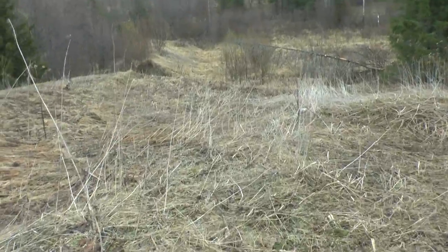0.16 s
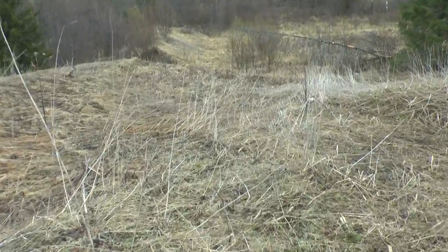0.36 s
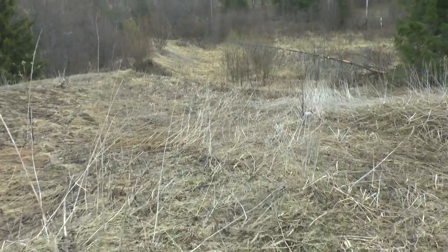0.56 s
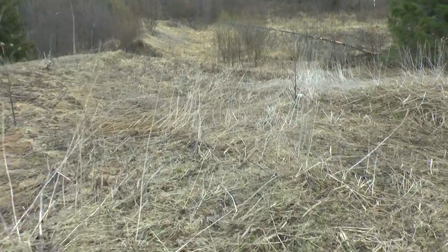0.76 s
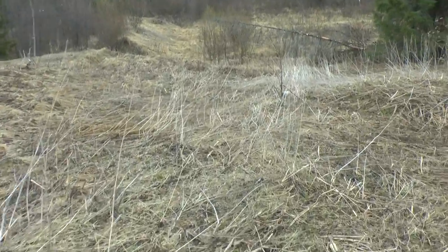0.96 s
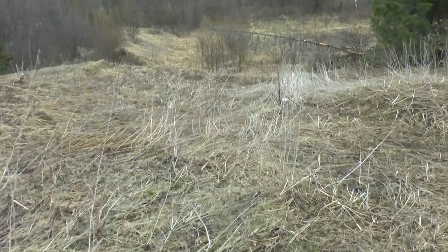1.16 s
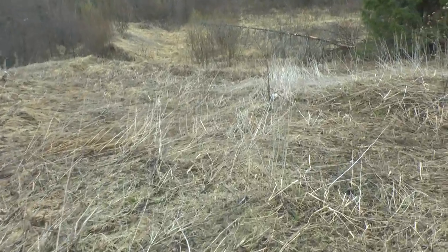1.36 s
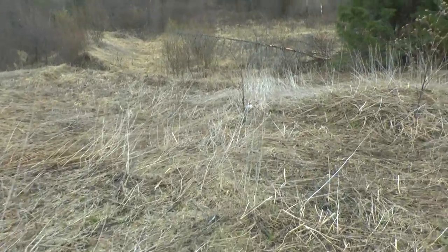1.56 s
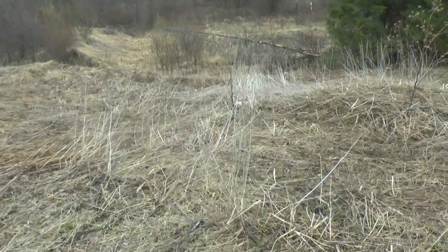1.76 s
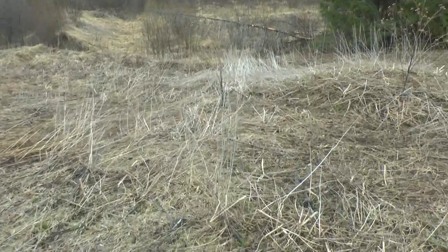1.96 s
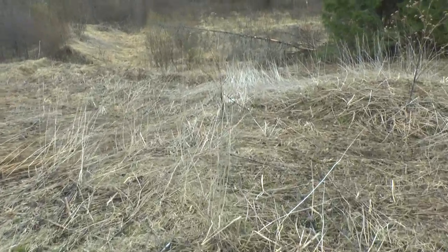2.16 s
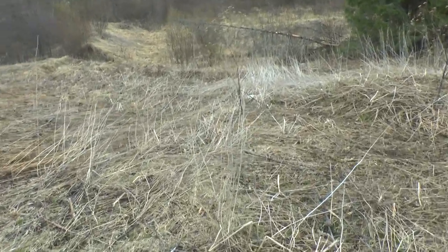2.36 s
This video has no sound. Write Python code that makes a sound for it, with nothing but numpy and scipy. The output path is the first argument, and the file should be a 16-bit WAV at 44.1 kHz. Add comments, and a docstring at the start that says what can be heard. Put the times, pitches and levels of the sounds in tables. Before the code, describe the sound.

Slow footsteps through dry, matted grass, heard close from just above the feet: straw rustles, stalks crackle, stems snap sharply and litter crunches dully, over low weight rumbles and a faint steady outdoor background.

```python
"""A rustle of dry straw and its first snapping stems open slow steps through flattened grass on a slope.
Heard from just above the feet: fibres rub and stalks crackle as filtered random clicks, stems snap as
short rings with bursts of splinter noise, and the shoe brushes blades aside as swells of dense clicks.
The damp litter crunches in dull crumbs and knocks as sagging tones; filtered noise gives the rumble
of the weight rolling over the foot and a faint, steady outdoor background."""
import sys
import numpy as np
from scipy import signal
from scipy.fft import rfft, irfft, next_fast_len
from scipy.io import wavfile

SR = 44100
rng = np.random.default_rng(int(sys.argv[2]) if len(sys.argv) > 2 else 0)


def put_to_file(sound):
    """Save the sound as 16-bit audio at rate SR, in the file named by the first command-line argument."""
    columns = np.atleast_2d(sound).T  # one column per channel
    safe = np.clip(columns, -1, 1)
    whole_steps = np.round(safe * 32767)
    wavfile.write(sys.argv[1], SR, whole_steps.astype(np.int16))


N = 110250  # 2.5 s


def from_db(db):
    """Decibels to gain."""
    return 10 ** (np.asarray(db) / 20)


def rms_one(x):
    """Scale to unit power."""
    return x / np.sqrt(np.mean(x ** 2) + 1e-20)


def in_time(rows):
    """A control curve at every sample, straight between its points."""
    return np.interp(np.arange(N) / SR, *np.transpose(rows))


def swells(rows):
    """A gain that rises to each top and falls away evenly in dB; overlapping swells add in power."""
    t = np.arange(N) / SR
    power = 0
    for top_s, level_db, rise_s, fall_s in rows:
        slopes_from_top = np.maximum((top_s - t) / rise_s, (t - top_s) / fall_s)
        power = power + from_db(level_db - 20 * slopes_from_top) ** 2
    return np.sqrt(power)


def colour(x, points):
    """Causal (minimum-phase) filter with the given spectrum, built by folding its cepstrum."""
    size = 2 * next_fast_len(N)
    hz, db = np.transpose(points)
    bin_hz = np.arange(size // 2 + 1) * SR / size
    log_gain = np.log(from_db(np.interp(np.log(bin_hz + 1), np.log(hz), db)))
    cepstrum = irfft(log_gain)[:size // 2] * np.r_[1, np.full(size // 2 - 1, 2)]
    return irfft(rfft(x, size) * np.exp(rfft(cepstrum, size)), size)[..., :N]


def drift(hz):
    """Smooth random wander with spread 1, from noise through two equal low-pass poles."""
    r = np.exp(-2 * np.pi * hz / SR)
    noise = rng.standard_normal(N + SR)
    return rms_one(signal.lfilter([1], [1, -2 * r, r * r], noise)[SR:])  # drop the filter's run-in


def clicks(per_s, spread_db):
    """Random clicks of uneven size, each from its own direction: common and difference rows."""
    sizes = from_db(spread_db * np.minimum(rng.exponential(1, N), 3))
    return (rng.random(N) < per_s / SR) * sizes * rng.choice([-1, 1], (2, N))


# Filter on the left-right difference, which sets the stereo width: pitch_hz [Hz], gain_db [dB]
WIDTH = [(380, -17), (1300, -10), (5500, -14), (7500, -13), (9500, 1)]


def stereo(pair):
    """A common and a difference signal to left and right; the top treble is widest."""
    common, difference = pair
    return common + colour(difference, WIDTH) * np.array([[1], [-1]])


AIR_DB = -51.5
# Colour of the background, relative levels: pitch_hz [Hz], level_db [dB]
AIR_COLOUR = [(20, -41), (60, -2), (120, 4.5), (280, 3), (500, -7), (850, -8), (1450, -13), (2450, -4.5),
              (3300, -11.5), (6500, -16), (16000, -32)]


def air():
    """Faint steady outdoor background: wide, filtered noise at a constant level."""
    return from_db(AIR_DB) * stereo(rms_one(colour(rng.standard_normal((2, N)), AIR_COLOUR)))


# Colour of the rumble, relative levels: pitch_hz [Hz], level_db [dB]
RUMBLE_COLOUR = [(20, -32), (90, -0.5), (125, -0.5), (210, -7.5), (450, -30), (1500, -50)]
# Weight rolling over the foot, each slope spanning 20 dB from the top:
# top_s [s], level_db [dB], rise_s [s], fall_s [s]
WEIGHT_ROLLS = [(1.095, -39, 0.24, 0.17), (1.515, -41, 0.099, .1), (1.665, -34.5, 0.17, 0.16),
                (2.22, -40.5, 0.15, 0.22), (2.385, -40.5, 0.14, 0.24)]


def rumble():
    """Low noise swells and fades as the weight rolls over the foot."""
    noise = rms_one(colour(rng.standard_normal((2, N)), RUMBLE_COLOUR))
    return stereo(swells(WEIGHT_ROLLS) * noise)


THUD_ATTACK_S, THUD_SAG_S = 0.0012, 0.0015
# Dull knocks in the litter, level before the soft attack and the high-pass:
# start_s [s], level_db [dB], pitch_hz [Hz], t60_s [s]
THUDS = [(.079, -40, 440, .03), (0.1255, -34, 265, 0.032), (0.208, -31, 245, 0.03),
         (0.611, -33, 450, 0.026), (0.670, -19.5, 235, 0.025), (0.756, -31.5, 350, 0.018),
         (.941, -28, 220, .05), (1.458, -24, 420, .03), (1.483, -23, 300, .028), (1.873, -33, 410, .022),
         (2.368, -34, 380, .03), (2.477, -25, 260, 0.025)]


def knocks():
    """Heavily damped low tones that start an octave high and sag to pitch as the litter yields."""
    out = 0
    for start_s, level_db, pitch_hz, t60_s in THUDS:
        t = np.maximum(np.arange(N) / SR - start_s, 0)
        cycles = pitch_hz * (t + THUD_SAG_S * (1 - np.exp(-t / THUD_SAG_S)))
        attack = 1 - np.exp(-t / THUD_ATTACK_S)
        decay = from_db(level_db - 60 * np.minimum(t / t60_s, 4))
        out = out + np.sin(2 * np.pi * cycles) * attack * decay
    return signal.sosfilt(signal.butter(2, 120, "high", fs=SR, output="sos"), out)


CRUMBS_PER_S, CRUMB_SPREAD_DB = 600, 5.5
# Colour of the litter, relative levels: pitch_hz [Hz], level_db [dB]
LITTER_COLOUR = [(100, -14.5), (200, -5), (320, 2.5), (490, -3), (800, -9.5), (8000, -38)]
# Level of the crunch under the sole: time_s [s], level_db [dB]
SOLE_CRUNCH = [(0, -49), (.3, -53), (.45, -48), (.62, -57), (.87, -56), (.928, -39.5), (.98, -57),
               (1.35, -55), (1.468, -34.5), (1.545, -47), (1.77, -58), (1.86, -48), (2.03, -47.5),
               (2.1, -59), (2.44, -48.5), (2.468, -40.5)]


def sole():
    """The matted litter under the sole gives way in dull crumbs, each a filtered click."""
    crumbs = rms_one(colour(clicks(CRUMBS_PER_S, CRUMB_SPREAD_DB), LITTER_COLOUR))
    return stereo(crumbs * from_db(in_time(SOLE_CRUNCH)))


BLADES_PER_S, BLADE_SPREAD_DB = 700, 4
# Colour of the brushed blades, relative levels: pitch_hz [Hz], level_db [dB]
BRUSH_COLOUR = [(200, -14), (550, 0), (1500, -3), (2300, 0), (10000, -28)]
# The shoe sweeping through the grass, each slope spanning 20 dB from the top:
# top_s [s], level_db [dB], rise_s [s], fall_s [s]
SWEEPS = [(.37, -46.5, .08, .17), (.542, -41.5, .05, .03), (.92, -47, .03, .05), (1.465, -39.5, .08, .12),
          (2.03, -44.5, .13, .1)]


def brush():
    """The shoe sweeps through soft blades: dense clicks make a midrange crunch."""
    blades = rms_one(colour(clicks(BLADES_PER_S, BLADE_SPREAD_DB), BRUSH_COLOUR))
    return stereo(swells(SWEEPS) * blades)


RING_PEAK_SHARE = 0.044  # a stem's ring is strongest after this share of the snap's t60
RING_DB, SPLINTER_DB = -3.5, 2  # trims of the two parts of a snap
# Colour of a burst of splinters: pitch_hz [Hz], gain_db [dB]
SPLINTER_COLOUR = [(500, -17), (1500, -20.5), (2300, -4), (6500, -0.5), (9500, -8), (16000, -23.5)]
# Stiff stems snapping, level before the trims and the splinter colour; splinter_db is splinters over
# ring, and a last column, positive to the left, appears only for stems off to one side:
# start_s [s], level_db [dB], pitch_hz [Hz], t60_s [s], splinter_db [dB], pan_db [dB]
SNAPS = [(.046, -21, 1900, .012, 8), (.1497, -28, 2860, .008, 0), (0.3113, -27.5, 2050, .025, 6),
         (0.335, -25, 1940, 0.022, 8), (0.3503, -19, 4460, .008, -6), (0.3806, -15, 5300, 0.0038, 8),
         (0.4592, -12, 5150, 0.016, 10), (0.491, -20.5, 3650, 0.01, 11), (.5441, -15.5, 2300, 0.0092, 0),
         (.5781, -10, 2580, 0.0096, 6.5), (0.5977, -17, 2400, 0.0042, 25), (.917, -19, 2500, 0.011, 4),
         (0.9435, -17, 2420, 0.011, 3, -4), (0.979, -20, 3950, 0.0066, 7), (1.0423, -20, 6920, 0.018, -1),
         (1.0648, -8, 3280, 0.0084, 2.5, -2), (1.1703, -18.5, 3200, 0.0042, 1),
         (1.2045, -14, 2430, 0.0028, -0.5), (1.3244, -29, 1890, 0.019, -17, 14.5),
         (1.431, -18, 1990, 0.013, 5), (1.478, -12, 4700, 0.006, -1, -5), (1.4883, -18, 5600, .008, -2),
         (1.5097, -13, 3700, 0.0079, -3, -4), (1.5852, -17, 2380, 0.008, 15),
         (1.6113, -15.5, 4900, .005, 8, 4), (1.6308, -15, 4400, 0.0068, 1), (1.6741, -17, 6550, 0.014, 1),
         (1.8469, -3.5, 4750, 0.0021, -3, -2.5), (1.9695, -26, 1200, .007, 5),
         (2.0429, -14.5, 2360, 0.008, -6), (2.0462, -27, 1850, .016, -5), (2.085, -26, 2600, .004, 5),
         (2.147, -18, 6940, 0.0036, -4), (2.228, -18, 4260, 0.0075, 3), (2.4214, -14, 4280, 0.0052, -40, 7)]


def snaps():
    """A breaking stem rings for a few cycles and sheds a burst of splinters."""
    rings, bursts = np.zeros((2, N + SR)), np.zeros((3, N + SR))
    t = np.arange(SR // 25) / SR
    for start_s, level_db, pitch_hz, t60_s, splinter_db, *aside in SNAPS:
        pan_db = sum(aside)  # 0 if the column is absent
        gain = from_db(level_db) / np.hypot(1, from_db(splinter_db))
        sides = gain * from_db([[pan_db / 2], [-pan_db / 2]])
        start = int(start_s * SR)
        span = slice(start, start + len(t))
        age = t / (RING_PEAK_SHARE * t60_s)
        ring = np.sin(2 * np.pi * pitch_hz * t) * age * np.exp(1 - age)
        rings[:, span] += sides * from_db(RING_DB) * ring
        decay = from_db(SPLINTER_DB + splinter_db - 60 * t / t60_s)
        common, difference = rng.choice([-1, 1], (2, len(t))) * decay
        bursts[:, span] += np.vstack([sides * common, gain * difference])
    left, right, difference = colour(bursts[:, :N], SPLINTER_COLOUR)
    return rings[:, :N] + np.array([left, right]) + stereo([0, difference])


CRACK_T60_S, TAIL_T60_S, TAIL_DB = 0.0045, 0.036, -3.5  # tail level against the crack


def stalks(hits, count=10):
    """Each click cracks one of several stalks: a broad tick with a short diffuse tail."""
    dealt = rng.integers(0, count, N)
    t = np.arange(SR // 40) / SR
    fall = from_db(-60 * t / CRACK_T60_S) + from_db(TAIL_DB - 60 * t / TAIL_T60_S)
    out = 0
    for k in range(count):
        crack = rms_one(rng.standard_normal((2, len(t))) * fall)
        out = out + signal.oaconvolve(hits * (dealt == k), crack, axes=1)[:, :N]
    return out


FIBRES_PER_S, FIBRE_SPREAD_DB, FIBRE_DB = 8000, 1.5, -3.5
CLUMP_DB, CLUMP_HZ = 4.8, 91  # spread and corner of the fibres' level wander
CRACKLES_PER_S, CRACKLE_SPREAD_DB, CRACKLE_DB = 130, 4, 0.5  # rate at the mean crush in dB
RATE_FOLLOWS = 0.65  # share of the crush's dB swing that the crackle rate follows
# Colour of the straw, relative levels: pitch_hz [Hz], level_db [dB]
STRAW_COLOUR = [(400, -24), (1450, -7.5), (1900, 0), (4500, 0.4), (6700, -1), (8200, -6.5), (10000, -11.5),
                (16000, -32)]
# How hard the straw is crushed, as rustle level before the fibre and crackle trims:
# time_s [s], level_db [dB]
CRUSH = [(0, -39), (.045, -43), (.075, -55), (.115, -52.5), (.17, -55), (.305, -53.5), (.345, -36.5),
         (.39, -37.5), (.44, -49), (.51, -43), (.55, -38.5), (.635, -56), (.725, -55.5), (.755, -45.5),
         (.785, -57), (.9, -53), (.92, -43.5), (1.05, -44), (1.2, -48), (1.26, -57), (1.42, -53),
         (1.445, -41), (1.495, -32.5), (1.555, -49), (1.625, -38), (1.675, -42.5), (1.71, -55), (1.89, -53),
         (1.912, -42.5), (1.95, -54), (2.03, -44), (2.11, -59), (2.15, -41), (2.19, -41.5), (2.27, -54),
         (2.5, -53)]


def straw():
    """Fibres rub in clumps; stalks crackle, more often and louder as the foot presses."""
    crush_db = in_time(CRUSH)
    busy = from_db(RATE_FOLLOWS * (crush_db - crush_db.mean()))
    clumps = from_db(CLUMP_DB * drift(CLUMP_HZ))
    fibres = rms_one(colour(clicks(FIBRES_PER_S, FIBRE_SPREAD_DB) * clumps, STRAW_COLOUR))
    hits = clicks(CRACKLES_PER_S * busy, CRACKLE_SPREAD_DB)
    hits = hits / np.sqrt(np.maximum(busy, 1))  # denser hits are smaller, so rate adds no power
    crackles = rms_one(colour(stalks(hits), STRAW_COLOUR))
    return stereo(from_db(crush_db) * (from_db(FIBRE_DB) * fibres + from_db(CRACKLE_DB) * crackles))


def scene():
    """The steps in the open air."""
    return air() + rumble() + knocks() + sole() + brush() + snaps() + straw()


CUTOFF_HZ, RIPPLE_Q = 16200, 13
# Left-right balance, positive to the left: pitch_hz [Hz], lean_db [dB]
LEAN = [(400, -1.2), (6000, 0.3), (11000, 3)]
# Narrow peaks and a dip at the microphone: pitch_hz [Hz], gain_db [dB]
MIC_RIPPLE = [(490, 5.5), (700, 3.5), (1135, 2), (1570, -3.5), (1930, 2.5)]


def record(dry):
    """The microphone rings a little in the midrange, the treble leans left, the top is cut."""
    sides = []
    for side, sign in zip(dry, (1, -1)):
        sides.append(colour(side, [(hz, sign * lean_db / 2) for hz, lean_db in LEAN]))
    x = np.array(sides)
    for pitch_hz, gain_db in MIC_RIPPLE:
        resonance = signal.lfilter(*signal.iirpeak(pitch_hz, RIPPLE_Q, fs=SR), x)
        x = x + (from_db(gain_db) - 1) * resonance
    return signal.sosfilt(signal.ellip(10, .1, 80, CUTOFF_HZ, fs=SR, output="sos"), x)


dry = scene()
out = record(dry)
put_to_file(out)
```